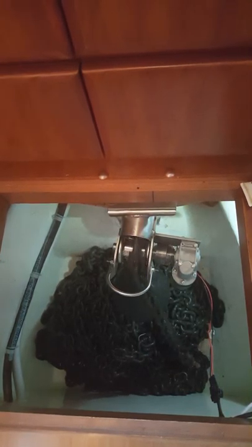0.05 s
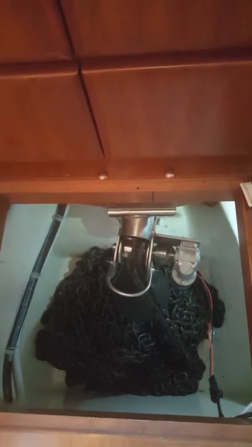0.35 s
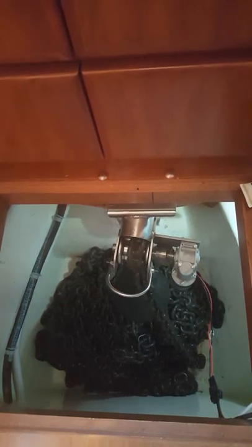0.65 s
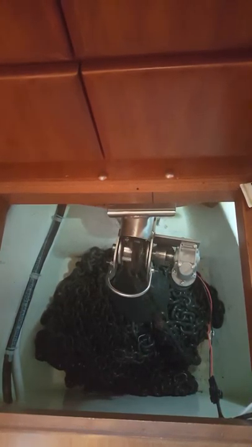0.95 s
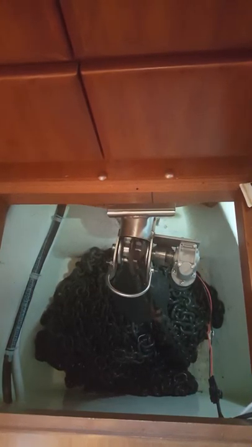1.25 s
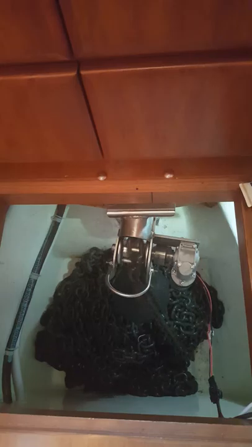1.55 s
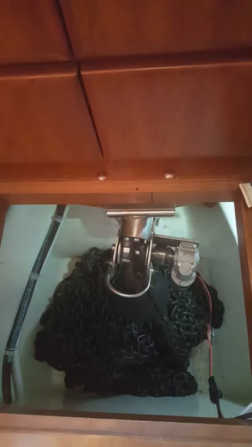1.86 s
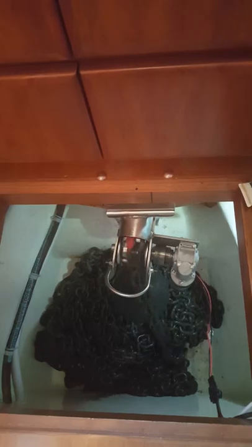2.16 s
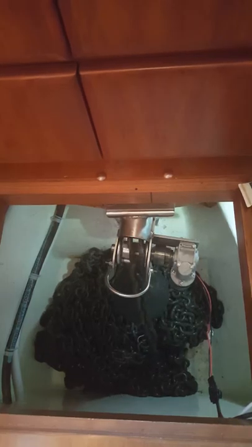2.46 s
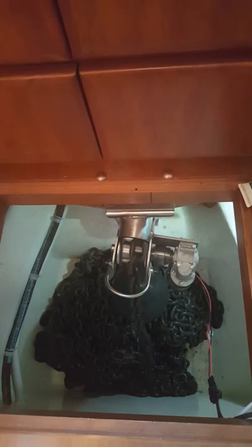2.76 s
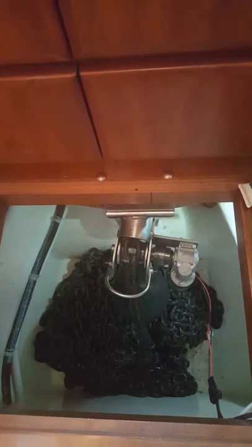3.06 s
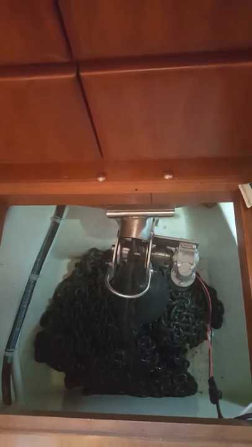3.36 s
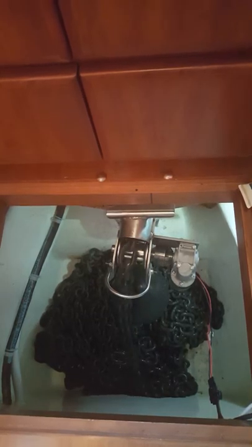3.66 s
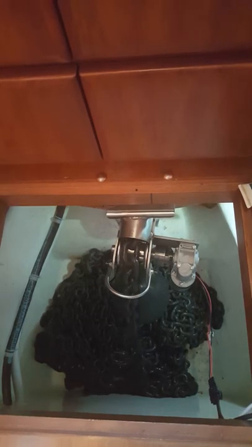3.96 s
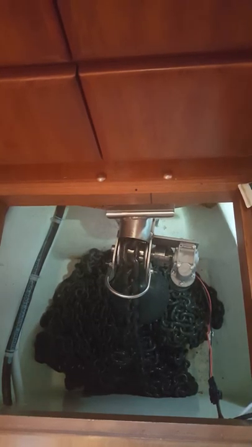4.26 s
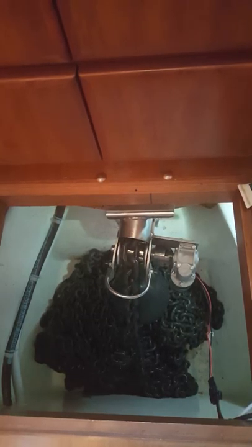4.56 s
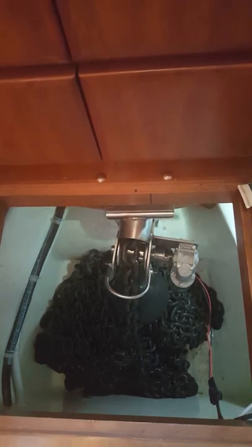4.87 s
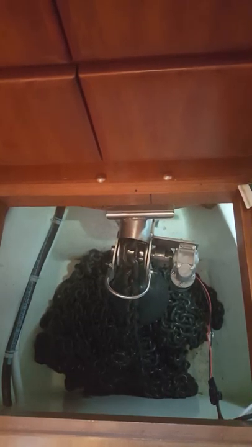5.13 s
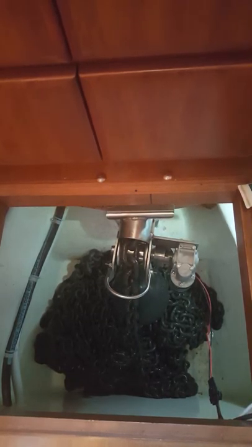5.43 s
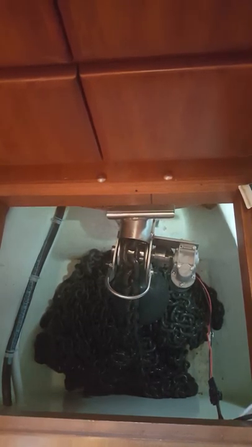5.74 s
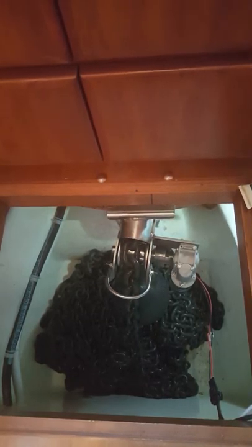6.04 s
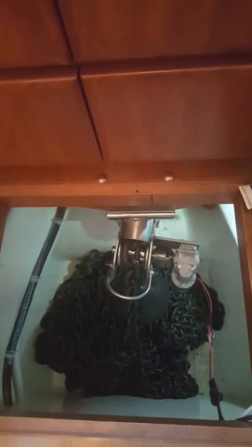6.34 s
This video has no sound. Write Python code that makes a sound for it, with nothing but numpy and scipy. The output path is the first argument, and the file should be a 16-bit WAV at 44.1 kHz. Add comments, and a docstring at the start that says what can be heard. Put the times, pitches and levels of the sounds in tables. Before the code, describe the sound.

From the very start, a heavy anchor chain runs loudly over a powered roller into a boat's locker. Links strike the roller in uneven ringing clanks, several a second, over a continuous grind, rattle and rumble. Falling links clink and jingle on the heap, with sharp steel ticks and dull thumps against the hull. A faint, wavering winch whine runs beneath. The sound is close, with the tight reflections of a small, hard compartment. At about 3.8 seconds the chain and winch stop abruptly. The slack settles with a brief, softer scrape and a tiny clink around 4 to 4.2 seconds. The boat's engine, idling underneath all along, is then left alone as a much quieter low throb and muffled clatter. The woodwork buzzes lightly a few times from 5.5 seconds until the end at about 6.5 seconds.

```python
"""An anchor chain clanks and grinds over a powered roller into a boat's locker, stopping just before 4 s.
Impacts excite the modes of the roller, of the links on the heap, of a steel fitting and of the hull;
dense streams of small contacts, filtered by resonances, merge into rumble, grind, rattle and jingle.
Reflections in the small, hard locker smear every blow. The winch whines while the chain runs,
and the boat's engine idles underneath throughout."""
import sys
import numpy as np
from scipy import signal
from scipy.fft import rfft, irfft
from scipy.io import wavfile

SR = 44100
rng = np.random.default_rng(int(sys.argv[2]) if len(sys.argv) > 2 else 0)


def inscribe(sig):
    """Save sig as 16-bit PCM at rate SR to the path in sys.argv[1].

    A 1-D sig is mono; a 2-D sig holds one channel per row.
    Samples are clipped to [-1, 1] before scaling.
    """
    pcm = np.round(np.clip(np.atleast_2d(sig).T, -1, 1) * 32767)
    wavfile.write(sys.argv[1], SR, pcm.astype(np.int16))


N = 286650
TIME = np.arange(N) / SR
BLOW_TIME = TIME[:SR // 2]
STOP_S, BRAKE_DB_PER_S = 3.797, 145


# Links hitting the roller: start_s, level_db, pitch_hz, upper_modes_db
ROLLER_HITS = [(0.0195, -6, 1150, -17), (0.212, -9, 1204, -25.5), (0.2367, -1, 1080, -27),
               (0.3857, -2.5, 1040, -11), (0.523, -3, 1136, -30), (0.5576, -11, 1210, -25),
               (0.681, -8.5, 1090, -23), (0.8623, -4, 1085, -23.5), (0.938, -12, 1100, -21.5),
               (0.994, -6, 1170, -11.5), (1.1986, -8.5, 1084, -29), (1.491, -2.5, 1120, -14.5),
               (1.9443, -4, 1160, -26), (1.9629, -4.5, 1079, -16.5), (2.0346, -13, 1360, -3),
               (2.123, -6.5, 1040, -21), (2.246, -18.5, 1100, -17), (2.374, -10.5, 917, -13),
               (2.583, -7, 1079, -8.5), (2.6508, -5, 1213, -16), (2.7172, -5, 1320, -12),
               (2.8428, -7.5, 1100, -20), (2.9454, -8.5, 1080, -8), (3.05, -0.5, 1070, -17),
               (3.1348, -10, 1220, -12), (3.196, -6.5, 1210, -9.5), (3.3417, -6.5, 1094, -17),
               (3.4822, -8.5, 1140, -24), (3.5554, -9.5, 1090, -3.5), (3.655, -9.5, 1210, -12.5),
               (3.718, -7.5, 1150, -13), (3.832, -14, 1184, -10), (4.1154, -44, 1300, -16)]
# Modes of the roller: pitch_hz, t60_s, level_db
ROLLER_MODES = [(942.4, 0.16, -10), (1093.8, 0.12, -2), (1147, 0.05, -8), (1195, 0.05, -9.5),
                (1342, 0.1, -5), (1490, 0.019, -10.5), (1700, 0.011, -3.5), (1960, .035, -5.5),
                (2050, .035, -18), (2656, 0.046, -10.5)]
# Spectrum of a link's slap: frequency_hz, level_db
SLAP_SPECTRUM = [(400, -25.5), (900, -9.5), (1200, 3), (1600, -7.5), (2400, -2.5), (3500, -12.5),
                 (8000, -30)]

def clanks():
    """Impact excitation: links slap the roller and rebound; harder contacts bring out its upper modes."""
    rings, slaps = np.zeros((2, N))
    for start, db, hz, upper_db in ROLLER_HITS:
        body = ring(favour(ROLLER_MODES[:6], hz, width_hz=156), scatter_db=1.4, detune=0.025)
        upper = undb(upper_db + 9) * ring(ROLLER_MODES[6:], scatter_db=2.5, detune=0.031)
        add(rings, start, undb(db) * chatter(body + upper, span_s=0.025, bounce_db=-15))
        add(slaps, start, undb(db - 16) * burst(t60=0.035))
    return locker(rings + colour(slaps, SLAP_SPECTRUM), wet_db=-1, t60=0.19, pan_db=-3)


# Bights of chain knocking the hull: start_s, level_db, pitch_hz, tumble_s
HULL_HITS = [(0.077, -12.5, 203, 0.046), (0.524, -8.5, 113, 0.017), (0.643, -5.5, 316, 0.013),
             (0.954, -1.5, 162, 0.009), (1.016, -11.5, 129, .015), (1.137, -3, 131, 0.015),
             (1.295, -11.5, 191, 0.03), (1.511, -17, 155, 0.024), (1.826, -11, 139, 0.037),
             (2.025, -10, 195, .02), (2.256, -3, 159, 0.011), (2.32, -5, 287, 0.017),
             (2.442, -4.5, 154.5, 0.056), (2.682, -2, 135.7, 0.012), (2.861, -2, 178, 0.071),
             (3.01, -12, 185, .02), (3.097, -7.5, 115.4, 0.04), (3.32, -1.5, 165.5, 0.027),
             (3.397, -1, 304.5, 0.014), (3.546, -11.5, 116, 0.024), (3.74, -5, 101, 0.11)]

def thumps():
    """Damped vibration: the soft weight of a bight of chain sets a hull panel swinging briefly."""
    track = np.zeros(N)
    push = 1 - np.exp(-BLOW_TIME / 0.014)
    for start, db, hz, _ in HULL_HITS:
        modes = [(hz, 0.17, 0), (hz * 0.696, 0.12, -8), (hz * 2, 0.1, -9)]
        add(track, start, undb(db) * push * ring(modes, scatter_db=1.5, detune=0.033))
    return locker(track, wet_db=-7.5, t60=0.14)


# Links landing on the heap: start_s, level_db, pitch_hz
LANDINGS = [(0.1839, -15, 3830), (0.2444, -10.5, 4680), (0.367, -21, 5300), (0.498, -8.5, 5440),
            (0.536, -10, 4500), (0.589, -9.5, 5710), (0.8092, -14, 4780), (0.8938, -7.5, 5090),
            (1.191, -4, 5120), (1.5547, -14.5, 5120), (1.631, -16, 5660), (1.7794, -14, 4970),
            (1.827, -17.5, 4200), (2.0073, -13, 4970), (2.2187, -13.5, 3720), (2.251, -8.5, 3600),
            (2.7283, -13.5, 5160), (3.318, -7.5, 5850), (3.36, -7.5, 5140), (3.556, -14, 4540),
            (4.1182, -40, 4030)]
# Spectrum of a landing's crack: frequency_hz, level_db
CRACK_SPECTRUM = [(1200, -26.5), (2600, 8.5), (4500, -6), (6500, -1), (8200, -16), (9500, -31),
                  (15000, -36.5)]

def clinks():
    """Free vibration: a fallen link cracks, rings in a cluster of partials and chatters on the heap."""
    rings, cracks = np.zeros((2, N))
    for start, db, hz in LANDINGS:
        modes = [(partial, 0.036, 0) for partial in hz * np.geomspace(0.88, 1.17, num=6)]
        link = ring(modes, scatter_db=1.5, detune=0.02)
        add(rings, start, undb(db) * chatter(link, span_s=0.034, bounce_db=-15))
        add(cracks, start, undb(db - 1.5) * chatter(burst(t60=0.0096), span_s=0.05, bounce_db=-13))
    return locker(rings + colour(cracks, CRACK_SPECTRUM), wet_db=4, t60=0.16, pan_db=3)


# Jerks of the running chain: start_s, length_s, level_db
CHAIN_JERKS = [(0.014, 0.093, -20), (0.204, 0.11, -20.5), (0.348, 0.067, -21.5), (0.476, 0.138, -23.5),
               (0.71, 0.075, -25), (0.85, 0.073, -21.5), (0.983, 0.041, -20.5), (1.148, 0.097, -19.5),
               (1.28, 0.07, -22), (1.358, 0.063, -22.5), (1.477, 0.12, -23.5), (1.617, 0.034, -19),
               (1.777, 0.096, -22), (1.929, 0.036, -20), (1.997, 0.098, -26.5), (2.22, 0.035, -21),
               (2.56, 0.041, -25), (2.623, 0.016, -15.5), (2.705, 0.12, -20.5), (2.981, 0.11, -23.5),
               (3.183, 0.038, -22.5), (3.354, 0.036, -23), (3.536, 0.049, -26), (3.656, 0.045, -21.5),
               (3.718, 0.059, -26.5)]
# Slack settling after the stop: start_s, length_s, level_db
SLACK_SETTLES = [(3.93, 0.053, -45.5), (4.055, .02, -55), (4.113, 0.043, -50)]

def running_chain():
    """Contact noise: the chain runs steadily, jerks shake links loose, and the slack settles at the end."""
    drag = running() * undb(0.07 * (TIME - STOP_S / 2))  # grows a little as the heap builds up
    jerk = swells(CHAIN_JERKS, attack_s=0.007, t60=0.19)
    settle = swells(SLACK_SETTLES, attack_s=0.007, t60=0.19)
    loose = power_sum(jerk, settle)
    return rumble(drag, settle) + grind(drag, settle) + rattle(loose) + jingle(loose)


def running():
    """Exponential decay: the gain is 1 until the chain brakes, then falls quickly."""
    return undb(-BRAKE_DB_PER_S * np.maximum(TIME - STOP_S, 0))


# Resonances of the locker's panels: pitch_hz, width_hz, lift_db
PANEL_RESONANCES = [(89, 14, 3), (132.7, 12, 3), (167, 20, 4.5), (293.9, 24, 10), (516.5, 11, 5.5),
                    (616, 22, 6.5), (721, 13, 5.5), (792, 32, 5.5), (914, 33, 7.5), (1044.6, 40, 11.5),
                    (1157.5, 9.4, 5), (1200, 69, 10), (1380, 16, 0), (1391, 12, 14.5), (1540, 16, -1.5),
                    (1677, 16, 7.5), (2196, 25, 8.5)]
# Spectrum of the shaken hull: frequency_hz, level_db
RUMBLE_SPECTRUM = [(35, -52), (55, -30.5), (80, -3), (110, -1.5), (180, -0.5), (240, -6.5), (330, -15),
                   (600, -65)]

def rumble(drag, settle):
    """Structure-borne sound: heavy contacts shake the hull, more so while a bight tumbles down."""
    tumbles = [(start, length, db) for start, db, _, length in HULL_HITS]
    tumble = swells(tumbles, attack_s=0.015, t60=0.14)
    hull = unit(colour(contacts(per_s=900, spread_db=2.2), RUMBLE_SPECTRUM, PANEL_RESONANCES))
    envelope = power_sum(undb(-20.5) * drag, undb(-11.5) * tumble, undb(13.5) * settle)
    return locker(hull * envelope, wet_db=-8, t60=0.073)


# Spectrum of links sliding on the panels: frequency_hz, level_db
GRIND_SPECTRUM = [(120, -29), (240, -4.5), (350, 0.5), (460, -6), (540, -5), (650, -1.5), (950, -9),
                  (1250, -8.5), (1600, -10), (2300, -15.5), (3300, -24), (6000, -48)]

def grind(drag, settle):
    """Forced vibration: sliding links drive all the panels of the locker at once."""
    mid = colour(contacts(per_s=3000, spread_db=2), GRIND_SPECTRUM, PANEL_RESONANCES)
    side = colour(contacts(per_s=3000, spread_db=2), GRIND_SPECTRUM, PANEL_RESONANCES)
    envelope = power_sum(undb(-17.5) * drag, undb(12) * settle)
    return wide(mid, undb(-1.5) * side, side_hz=422) * envelope


# Spectrum of loose links on the roller: frequency_hz, level_db
RATTLE_SPECTRUM = [(600, -28.5), (1000, -9.5), (1300, 1.5), (1700, 2), (2400, 0), (3200, -8), (4500, -6),
                   (9000, -46.5)]

def rattle(loose):
    """Random impacts: loose links tap and ring on the roller, coloured by the panel resonances."""
    taps = contacts(per_s=800, spread_db=3.6)
    rings = tinkles(low_hz=698, high_hz=3972, decay_cycles=7.6, spread_db=3.1, count=2500)
    links = unit(colour(taps + rings, RATTLE_SPECTRUM, PANEL_RESONANCES))
    envelope = power_sum(undb(-32) * running(), loose)
    return locker(links * envelope, wet_db=2.2, t60=0.1, pan_db=-4)


# Spectrum of links sliding over the heap: frequency_hz, level_db
JINGLE_SPECTRUM = [(1500, -17), (3000, 3.5), (4000, -6.5), (5000, 0.5), (6600, 2.5), (8000, -12),
                   (9300, -20.5), (10500, -23.5), (12500, -12.5), (15500, -34)]
# High resonances of the links: pitch_hz, width_hz, lift_db
LINK_RESONANCES = [(8270, 220, 6.5), (11335, 120, 16), (12080, 120, 12), (12290, 100, 8), (12770, 130, 7)]

def jingle(loose):
    """Granular flow: links collide as the heap slides, more so after each jerk and landing."""
    slide = swells([(start, 0.02015, db) for start, db, _ in LANDINGS], attack_s=0.0094, t60=0.24)
    taps = contacts(per_s=400, spread_db=1.8)
    rings = tinkles(low_hz=2500, high_hz=9000, decay_cycles=11, spread_db=4.4, count=2000)
    heap = unit(colour(taps + undb(-5) * rings, JINGLE_SPECTRUM, LINK_RESONANCES))
    envelope = power_sum(undb(-42) * running(), undb(-12.5) * loose, undb(-23) * slide)
    return locker(heap * envelope, wet_db=12, t60=0.044, pan_db=6)


# Links snapping straight: start_s, level_db
SNAPS = [(0.367, -14.5), (0.4858, -11.5), (0.8117, -13.5), (0.989, -18), (1.1233, -13), (1.44, -15),
         (1.5342, -19), (1.748, -12.5), (1.907, -13), (2.104, -14.5), (2.3754, -22), (2.6712, -14.5),
         (2.821, -17), (2.8623, -12), (3.175, -21), (3.473, -17.5), (3.6126, -11.5)]
# Spectrum of a snap: frequency_hz, level_db
SNAP_SPECTRUM = [(1000, -8), (3000, 11.5), (8000, 3.5), (10000, -11.5), (13000, 2.5), (16000, -13)]

def ticks():
    """Short contact, broad spectrum: hard steel on steel gives a bright crack."""
    track = np.zeros(N)
    for start, db in SNAPS:
        add(track, start, undb(db) * burst(t60=0.018))
    return locker(colour(track, SNAP_SPECTRUM), wet_db=3.7, t60=0.26, pan_db=2.5)


# Links grazing the steel fitting: start_s, level_db, pitch_hz
FITTING_TOUCHES = [(0.184, -12.5, 12300), (0.2614, -12.5, 11800), (0.3044, -15, 11900),
                   (0.7622, -21.5, 11500), (0.813, -11, 11300), (0.8455, -13.5, 12400), (0.904, -19, 12000),
                   (2.0263, -27, 11300), (2.167, -20.5, 11900), (2.6744, -10.5, 12100),
                   (2.6838, -17, 12450), (2.883, -26.5, 12100), (2.9821, -19, 11200),
                   (3.0075, -17.5, 12100), (3.2244, -40, 8400), (3.384, -32.5, 8390), (3.6825, -25, 11300),
                   (3.7277, -28.5, 8400)]
# Modes of the fitting: pitch_hz, t60_s, level_db
FITTING_MODES = [(8250, .12, -1), (8450, .1, -3), (11320, .14, 1), (11390, .1, -5), (12050, .13, -1),
                 (12110, .13, 0), (12280, .13, -1), (12750, .14, 1), (12830, .1, -5)]
# Spectrum of steel rasping on it: frequency_hz, level_db
RASP_SPECTRUM = [(10500, -20.5), (11250, 0.5), (11700, -6.5), (12100, 5), (12850, 0.5), (13500, -20)]

def grazes():
    """Repeated excitation: a link rasps along the fitting, each touch adding to a thin, high ring."""
    rings, rasps = np.zeros((2, N))
    for start, db, hz in FITTING_TOUCHES:
        touch = ring(favour(FITTING_MODES, hz, width_hz=900), scatter_db=1.64, detune=0.0015)
        add(rings, start, undb(db) * chatter(touch, span_s=0.035, bounce_db=-2.5, count=6))
        add(rasps, start, undb(db - 22.5) * burst(t60=0.16))
    return locker(rings + colour(rasps, RASP_SPECTRUM, LINK_RESONANCES), wet_db=1.5, t60=0.11)


def winch(pitch_hz=706):
    """Modulation: the gears' whine wavers under the jerking load and dies away as the chain stops."""
    phase = 2 * np.pi * np.cumsum(pitch_hz * (1 + 0.012 * wander(10))) / SR
    shift = np.array([[1.3], [0]])  # standing waves put left and right out of phase
    return running() * undb(-29 + 2.5 * wander(5.3)) * np.sin(phase + shift)


# Harmonics of the firing rate: multiple, level_db
FIRING_HARMONICS = [(1, -5), (2, -12.5), (4, -16.5)]
# Course of the engine's throb: time_s, level_db
THROB_LEVELS = [(0.0, -43), (0.34, -42), (0.67, -55), (0.83, -44), (2.9, -37), (6.5, -44.5)]
# Steady hums in the hull: pitch_hz, level_db
HULL_HUMS = [(63.3, -52.5), (95.1, -51.5)]

def engine(firing_hz=30.3):
    """Periodic forcing: slow firings throb through the humming hull and shake the joinery."""
    phase = 2 * np.pi * np.cumsum(firing_hz * (1 + 0.006 * wander(0.83))) / SR
    throb = sum(undb(db) * np.sin(k * phase + rng.uniform(0, 2 * np.pi)) for k, db in FIRING_HARMONICS)
    throb_db = np.interp(TIME, *np.transpose(THROB_LEVELS)) + 1.5 * wander(4.6)
    hum = sum(undb(db) * np.sqrt(2) * np.sin(2 * np.pi * hz * TIME) for hz, db in HULL_HUMS)
    return unit(throb) * undb(throb_db) + hum + joinery(phase)


# Resonances of the woodwork: pitch_hz, width_hz, lift_db
WOOD_RESONANCES = [(193.6, 5.8, 9), (293, 14, 9), (371, 8.3, 4), (957, 38, 8)]
# Spectrum of the engine's muffled clatter: frequency_hz, level_db
CLATTER_SPECTRUM = [(30, -12.5), (80, -6.5), (140, 0.5), (178, -10.5), (215, 2), (290, -5), (390, -3),
                    (480, -14.5), (630, -9.5), (950, -19.5), (1300, -24), (2000, -30.5), (2600, -44),
                    (4000, -48.5), (9000, -57.5), (15000, -56.5)]
# Spectrum of the buzzing woodwork: frequency_hz, level_db
BUZZ_SPECTRUM = [(120, -25), (240, 6), (380, 1), (480, -11), (650, -17), (1500, -32), (4000, -63)]
# Moments of louder buzzing: start_s, length_s, level_db
BUZZ_SWELLS = [(5.46, 0.23, -36), (5.89, 0.06, -36), (6.19, 0.038, -32)]

def joinery(phase):
    """Sympathetic resonance: noise pulsing with the firings clatters and buzzes in the woodwork."""
    pulse = 1 + 0.089 * np.cos(phase)

    def woodwork(spectrum):
        mid, side = (colour(rng.standard_normal(N) * pulse, spectrum, WOOD_RESONANCES) for _ in range(2))
        return wide(mid, side, side_hz=350)

    clatter = woodwork(CLATTER_SPECTRUM) * undb(-38 - 0.2 * wander(8.7))
    buzz = woodwork(BUZZ_SPECTRUM) * swells(BUZZ_SWELLS, attack_s=0.025, t60=0.38)
    return clatter + buzz


# Spectrum of a faint, high hiss: frequency_hz, level_db
HISS_SPECTRUM = [(11000, -21), (13800, -9.5), (14500, 0), (15300, -8), (16000, -20.5)]

def hiss():
    """Band-limited noise: a thin, steady hiss, uncorrelated at left and right."""
    return undb(-79) * np.array([colour(noise, HISS_SPECTRUM) for noise in rng.standard_normal((2, N))])


def locker(x, wet_db, t60, pan_db=0):
    """Reverberation: direct sound arrives first at the left; dense reflections differ at each side."""
    tail = np.array([burst(t60), burst(t60)]) * (1 - np.exp(-BLOW_TIME / 0.00022))
    tail = signal.sosfilt(signal.butter(2, 380, "high", fs=SR, output="sos"), tail)
    response = undb(wet_db) * tail / np.sqrt(np.sum(tail ** 2) / 2)
    response[0, 0] += 1
    response[1, 5] += 1  # five samples later at the right
    sides = undb(np.array([[pan_db], [-pan_db]]) / 2)
    return sides * signal.fftconvolve(x[None], response, axes=1)[:, :N] / np.sqrt(1 + undb(2 * wet_db))


def wide(mid, side, side_hz):
    """Diffuse field: left and right are in step in the bass and differ above side_hz; rms 1."""
    side = signal.sosfilt(signal.butter(2, side_hz, "high", fs=SR, output="sos"), side)
    return unit(np.array([mid + side, mid - side]))


def ring(modes, scatter_db, detune):
    """Modal superposition: one blow starts damped sines, weighted by the place of contact; peak 1."""
    y = np.zeros(len(BLOW_TIME))
    for hz, t60, db in modes:
        weight, mistune, polarity = rng.standard_normal(3)
        tone = np.sin(2 * np.pi * hz * (1 + detune * mistune) * BLOW_TIME)
        y += undb(db + scatter_db * weight) * np.sign(polarity) * fade(t60) * tone
    return y / np.abs(y).max()


def favour(modes, hz, width_hz):
    """Selective excitation: the place of contact feeds the modes near hz most."""
    return [(f, t60, db - ((f - hz) / width_hz) ** 2) for f, t60, db in modes]


def chatter(sound, span_s, bounce_db, count=4):
    """Rebound: a blow shares its energy with a few bounces within span_s."""
    y = sound.copy()
    for when, size in rng.random((count, 2)):
        lag = 1 + int(when * span_s * SR)
        y[lag:] += undb(bounce_db) * (1 - when / 2) * (0.5 + size) * sound[:-lag]
    return y * np.linalg.norm(sound) / np.linalg.norm(y)


def contacts(per_s, spread_db):
    """Poisson process: tiny impacts of uneven size at random times; rms 1."""
    hit = rng.random(N) < per_s / SR
    polarity = rng.choice([-1, 1], N)
    size = undb(spread_db * np.minimum(rng.exponential(size=N), np.pi))
    return unit(hit * polarity * size)


def tinkles(low_hz, high_hz, decay_cycles, spread_db, count):
    """Damped oscillators: links ring at random, as strong per Hz as white noise of rms 1."""
    track, t = np.zeros(N), TIME[:SR // 50]
    for when, pitch, chance in rng.random((count, 3)):
        hz = low_hz + pitch * (high_hz - low_hz)
        size = undb(-spread_db * np.log(max(chance, np.exp(-np.pi)))) * np.sqrt(hz)
        add(track, when * N / SR, size * np.exp(-t * hz / decay_cycles) * np.sin(2 * np.pi * hz * t))
    return unit(track) * np.sqrt(2 * (high_hz - low_hz) / SR)


def colour(x, spectrum, peaks=()):
    """Minimum-phase filter: a smooth spectrum with resonances on top; white noise keeps its level."""
    size = 16384
    hz = np.maximum(np.arange(size // 2 + 1) * SR / size, 1)
    points, db = np.transpose(spectrum)
    smooth_db = np.interp(np.log(hz), np.log(points), db)
    peaks_db = sum(lift / (1 + (2 * (hz - centre) / width) ** 2) for centre, width, lift in peaks)
    cepstrum = irfft(np.log(unit(undb(smooth_db + peaks_db))))
    cepstrum[1:size // 2] *= 2  # folding the cepstrum makes the filter causal
    cepstrum[size // 2 + 1:] = 0
    return signal.fftconvolve(x, irfft(np.exp(rfft(cepstrum))))[:len(x)]


def swells(events, attack_s, t60):
    """Energy envelope: events (start_s, length_s, level_db) rise, hold and decay; their powers add."""
    power, t = np.zeros(N), TIME[:SR]
    for start, length, db in events:
        rise = np.minimum(t / attack_s, 1)
        decay = undb(-60 * np.maximum(t - length, 0) / t60)
        add(power, start, (undb(db) * rise * decay) ** 2)
    return np.sqrt(power)


def power_sum(*envelopes):
    """Incoherent addition: unrelated streams of contacts add in power."""
    return np.sqrt(sum(e ** 2 for e in envelopes))


def burst(t60):
    """Decaying noise: a spray of tiny impacts that starts at rms 1."""
    return fade(t60) * rng.standard_normal(len(BLOW_TIME))


def fade(t60):
    """Exponential damping: a fall of 60 dB in t60 seconds."""
    return np.exp(-np.log(1000) * BLOW_TIME / t60)


def wander(hz):
    """Low-passed noise: a slow random drift; rms 1."""
    return unit(signal.sosfilt(signal.butter(2, hz, fs=SR, output="sos"), rng.standard_normal(N)))


def add(track, start_s, sound):
    """Superpose a sound on a track."""
    i = int(start_s * SR)
    track[i:i + len(sound)] += sound[:N - i]


def undb(db):
    """Decibels to gain."""
    return 10 ** (np.asarray(db) / 20)


def unit(x):
    """Scale to rms 1."""
    return x / np.sqrt(np.mean(x ** 2))


def scene():
    """Superposition: chain, winch, engine and hiss add at left and right."""
    chain = clanks() + thumps() + clinks() + running_chain() + ticks() + grazes()
    return chain + winch() + engine() + hiss()


def record(dry, cutoff_hz=15550):
    """Clipping and band limiting: peaks flatten at full scale and a steep low-pass cuts the top."""
    return signal.sosfilt(signal.ellip(10, 0.1, 80, cutoff_hz, fs=SR, output="sos"), np.clip(dry, -1, 1))


dry = scene()
out = record(dry)
inscribe(out)
```